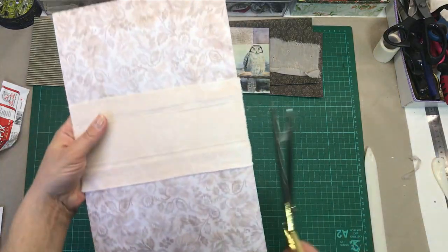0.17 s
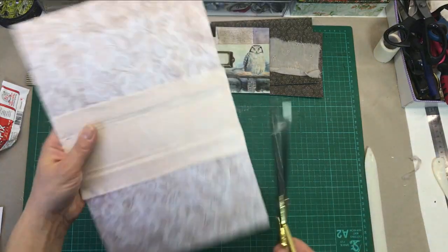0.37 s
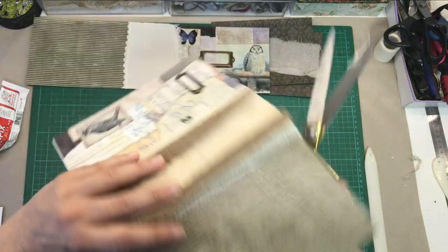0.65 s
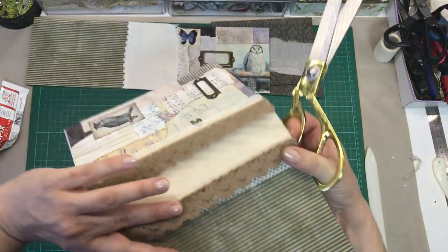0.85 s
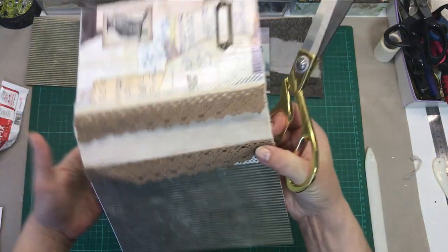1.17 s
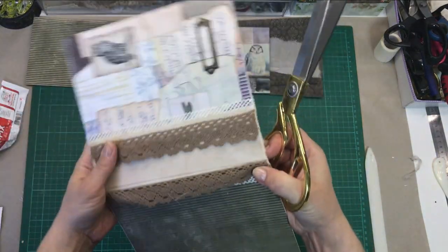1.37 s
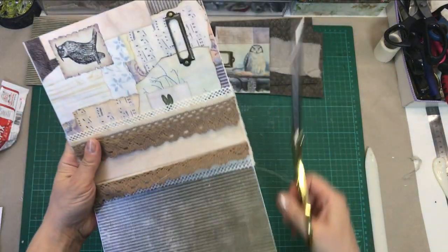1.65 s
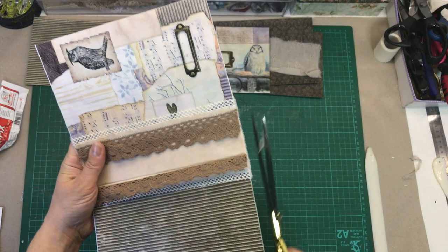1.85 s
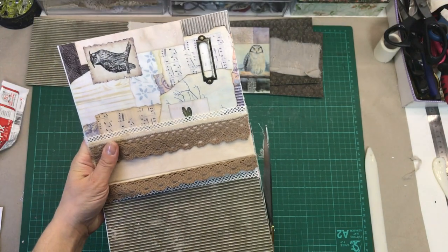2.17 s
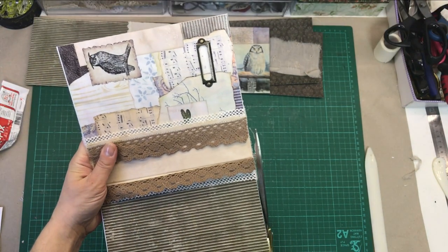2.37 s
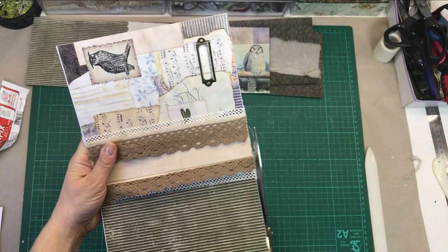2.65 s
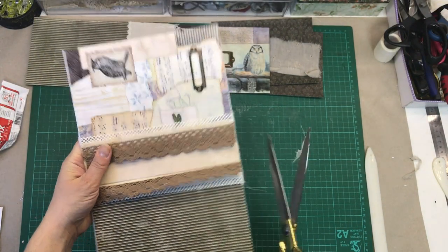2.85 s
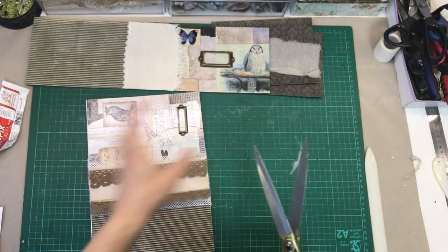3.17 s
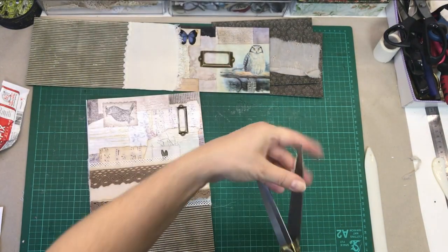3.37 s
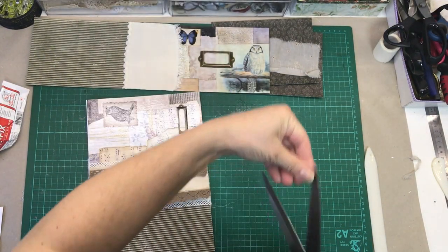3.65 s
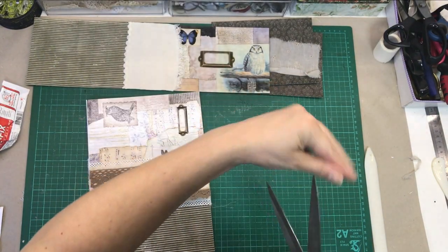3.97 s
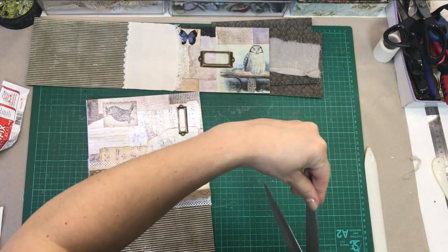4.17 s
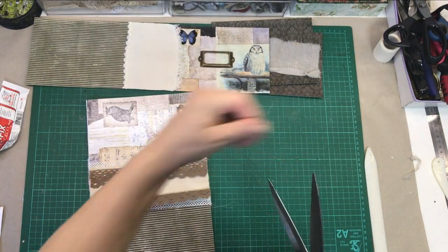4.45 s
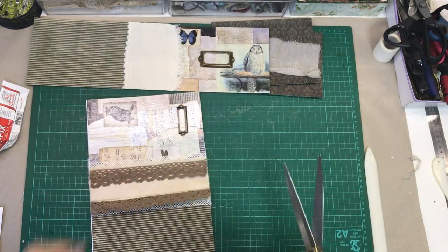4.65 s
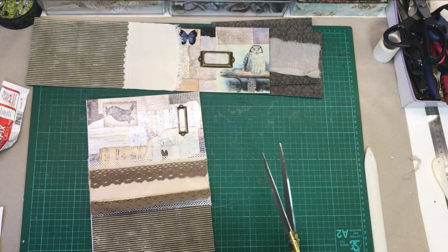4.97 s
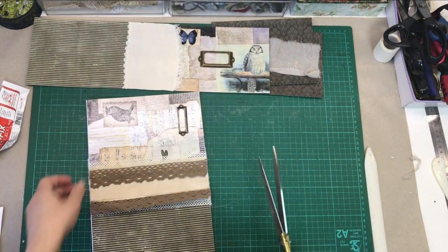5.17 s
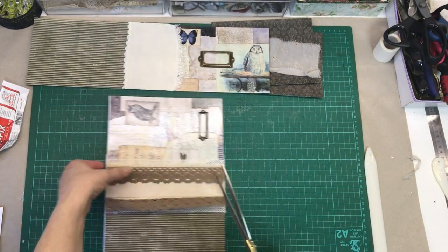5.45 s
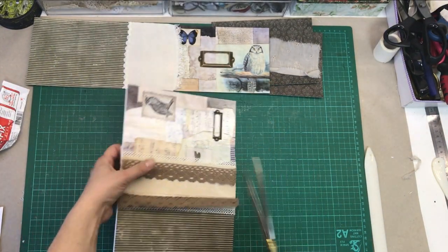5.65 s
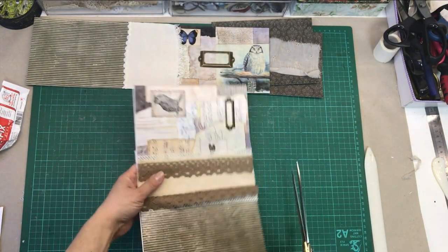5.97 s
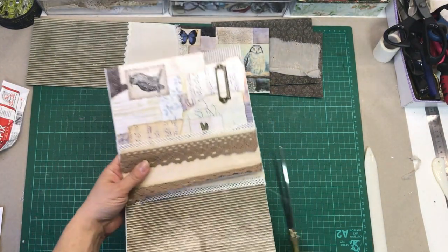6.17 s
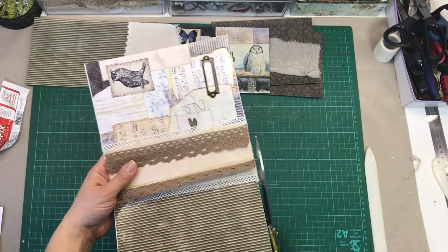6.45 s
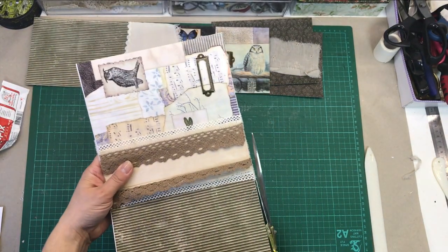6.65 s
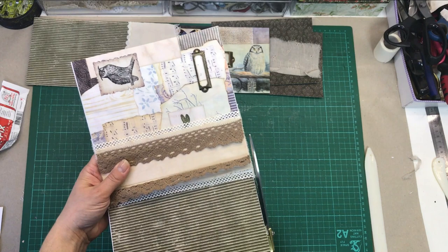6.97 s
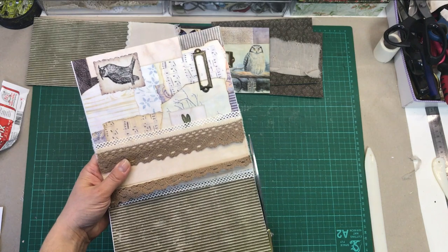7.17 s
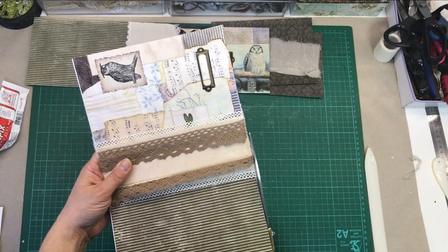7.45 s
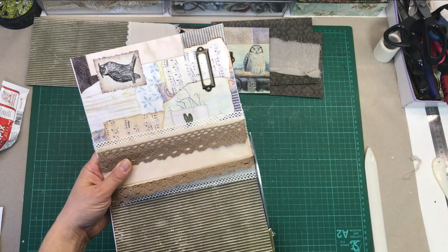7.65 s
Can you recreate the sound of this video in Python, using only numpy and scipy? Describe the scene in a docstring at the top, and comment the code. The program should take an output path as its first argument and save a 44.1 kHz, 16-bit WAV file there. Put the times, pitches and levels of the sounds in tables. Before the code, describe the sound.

Quiet handling of stitched card, faint scissor clicks, one hard clattering drop onto a mat, soft finger brushes, then raspy sliding with a squeaky scuff.

```python
"""A craft table in a quiet room: a stitched card is turned over, patted and dropped while scissors open, shut and snip.
Contacts ring banks of decaying modes: thuds and knocks in the table top, cracks and slaps, clicks in the steel blades.
Dense random slips make the card rasp, rumble and sing on the mat and the fingertips brush over thread.
Shaped noise gives the room tone, a wandering sine the table hum and gliding sines the squeaks of the blades."""
import sys
import numpy as np
from scipy import signal
from scipy.fft import rfft, irfft
from scipy.io import wavfile
from scipy.ndimage import uniform_filter1d

SR = 44100
rng = np.random.default_rng(int(sys.argv[2]) if len(sys.argv) > 2 else 0)


def wrap_up_sound(samples):
    """Save the sound to the file named by the first command line argument, as 16-bit audio."""
    columns = np.atleast_2d(samples).T
    # keep every value between -1 and 1, then stretch to whole-number steps
    tamed = np.clip(columns, -1, 1)
    steps = np.round(tamed * 32767).astype(np.int16)
    wavfile.write(sys.argv[1], SR, steps)


N = 344421


def from_db(db):
    """Amplitude gain of a level in dB."""
    return 10 ** (np.asarray(db) / 20)


def rms_one(x):
    """Scale a sound to unit rms."""
    return x / np.sqrt(np.mean(x ** 2) + 1e-20)


def coloured(x, spectrum, low_hz, high_hz):
    """Filter by a drawn curve, then scale to unit rms between the two frequencies."""
    hz = np.fft.rfftfreq(N, 1 / SR) + 1     # the 1 keeps the logarithm finite
    points = np.array(spectrum)
    gain_db = np.interp(np.log(hz), np.log(points[:, 0]), points[:, 1])
    shaped = rfft(x) * from_db(gain_db)
    inside = (hz > low_hz) & (hz < high_hz)
    return irfft(shaped, N) * N / np.sqrt(2 * np.sum(np.abs(shaped[inside]) ** 2))


def grains(per_s, spread_db):
    """Random slips of uneven size, a few much larger than the rest."""
    size_db = spread_db * np.minimum(rng.exponential(1, N), 5)
    sizes = from_db(size_db) * rng.standard_normal(N)
    return sizes * (rng.random(N) < per_s / SR)


def flicker(rate_hz, depth_db):
    """Random gain that wanders: noise smoothed by two equal poles, in dB rms."""
    r = np.exp(-2 * np.pi * rate_hz / SR)
    wander = signal.lfilter([1], [1, -2 * r, r * r], rng.standard_normal(N))
    return from_db(depth_db * rms_one(wander))


def resonance(x, hz, width_hz):
    """Two-pole band-pass of about unit peak gain."""
    r = np.exp(-np.pi * width_hz / SR)
    poles = [1, -2 * r * np.cos(2 * np.pi * hz / SR), r * r]
    return signal.lfilter(np.array([1, 0, -1]) * (1 - r * r) / 2, poles, x)


def band_pass(x, order, edges_hz):
    """Butterworth band-pass between two edges."""
    return signal.sosfilt(signal.butter(order, edges_hz, "band", fs=SR, output="sos"), x)


def swell(peak_s, rise_s, fall_s):
    """Bell-shaped stroke with its own rise and fall."""
    t = np.arange(N) / SR - peak_s
    return np.exp(-(t / np.where(t < 0, abs(rise_s), abs(fall_s))) ** 2)


def patchy(x, centres_hz):
    """Neighbouring bands that swell and fade apart as different fibres catch."""
    flicker_hz, flicker_db = 42.0, 2.5
    out = np.zeros(N)
    for hz in centres_hz:
        band = resonance(x * rng.choice([-1, 1], N), hz, 0.26 * hz)     # random signs keep bands unrelated
        out += band * flicker(flicker_hz, flicker_db)
    return out


def struck(times, levels_db, modes, chatter_s, chatter, favoured_hz=None, db_per_octave=0):
    """Each blow is a click with a dying chatter behind it and rings every mode with its own strength."""
    blow_spread_db = 1.2
    out, at = np.zeros(N), (np.array(times) * SR).astype(int)
    strengths = from_db(blow_spread_db * rng.standard_normal((len(at), len(modes))))
    if favoured_hz is not None:     # the spot struck favours the modes near one pitch
        octaves_off = np.abs(np.log2(np.array(modes)[:, 0] / favoured_hz[:, None]))
        off_db = db_per_octave * octaves_off
        strongest_db = np.max(off_db + np.array(modes)[:, 1], axis=1, keepdims=True)
        strengths *= from_db(off_db - strongest_db)
    fall = np.exp(-1 / (max(chatter_s, 1e-4) * SR))
    rough = rng.standard_normal(N)
    for k, (hz, level_db, t60_s) in enumerate(modes):
        clicks = np.full(N, 1e-18)
        np.add.at(clicks, at, from_db(np.array(levels_db) + level_db) * strengths[:, k])
        dying = signal.lfilter([1], [1, -fall], clicks)
        clicks += chatter * np.sqrt(1 - fall ** 2) * rough * dying
        clicks = resonance(clicks, hz, 1.25 * hz)     # a yielding contact: the ring builds over a cycle or two
        r, w = from_db(-60 / (t60_s * SR)), 2 * np.pi * hz / SR
        ring = signal.lfilter([0, np.sin(w)], [1, -2 * r * np.cos(w), r * r], clicks)
        out += (-1) ** k * ring     # alternate polarity from mode to mode
    return out


# Spectrum of the quiet room: hz [Hz], density_db [dB per Hz, relative]
ROOM_SPECTRUM = [(15, -50), (25, -6.5), (72, 2), (99, -4.5), (344, -8.5), (962, -17.5), (10400, -28.5),
                 (11900, -24.5), (16000, -28.5)]


def room_tone():
    """Steady noise shaped to the low rumble and faint hiss of a quiet room."""
    level_db = -52.5
    return from_db(level_db) * coloured(rng.standard_normal(N), ROOM_SPECTRUM, 25, 16000)


def room_echo(x):
    """A short tail of dull noise-like echoes."""
    gap_s, t60_s = .004, 0.12
    t = np.arange(int(.3 * SR)) / SR
    dull_noise = signal.lfilter([1], [1, -.6], rng.standard_normal(len(t)))
    tail = dull_noise * from_db(-60 * t / t60_s) * (t > gap_s)
    return signal.fftconvolve(x, tail / np.sqrt(np.sum(tail ** 2)))[:N]


# Hum kept going in the table top by the dragged card: time_s [s], level_db [dB]
HUM_LEVELS = [(.85, -49), (1.3, -41), (1.55, -44), (1.75, -73)]


def table_hum():
    """A low mode of the table top, kept going unevenly by friction: a sine of wandering pitch and level."""
    time_s, level_db = np.transpose(HUM_LEVELS)
    gain = from_db(np.interp(np.arange(N) / SR, time_s, level_db, left=-99, right=-99))
    pitch_hz = 68 * flicker(7.0, 0.39)
    hum = np.sqrt(2) * np.sin(2 * np.pi * np.cumsum(pitch_hz) / SR)
    return gain * flicker(14.0, 1.2) * hum


def fibre_slips():
    """Dense small slips plus a sparser crackle of fibres that catch and let go."""
    crackle_db = -4     # under the dense slips
    crackle = from_db(crackle_db) * rms_one(grains(2500, 1.8))
    dense = rms_one(grains(14000, 1.2))
    return rms_one((dense + crackle) * flicker(36.6, 1.2))


# Resonances of the card's hollows: pitch_hz [Hz], width_hz [Hz], level_db [dB]
CARD_HOLLOWS = [(623, 55, 19), (1040, 440, 10.5), (2555, 440, 4), (3460, 320, 5), (4020, 70, 1.5),
                (6320, 140, 4)]


def rasp_texture(slips):
    """Slips in patchy bands, heard also through the resonances of the card's hollows."""
    rasp = patchy(slips, np.geomspace(300, 12000, num=10))
    through_card = slips * rng.choice([-1, 1], N)     # the same slips with random signs
    for hz, width_hz, db in CARD_HOLLOWS:
        rasp = rasp + from_db(db) * resonance(through_card, hz, width_hz) * flicker(30, 3.0)
    return rasp


# Fingers slide over the card or the blades, rasp and brush alike:
# peak_s [s], half_length_s [s], rasp_level_db [dB], rasp_centre_hz [Hz]
FINGER_RUBS = [(0.12, 0.057, -56, 4830), (.357, 0.04, -53.5, 676), (0.837, 0.085, -50, 3440),
               (0.946, 0.057, -45.5, 1450), (1.4, 0.024, -43.5, 4200), (1.67, 0.36, -56, 1010),
               (2.243, 0.019, -48, 2330), (2.801, 0.035, -50.5, 3540), (3.09, 0.19, -49.5, 1260),
               (3.158, 0.049, -41, 2870)]
# The card drags over the mat, mostly rasp:
# peak_s [s], half_length_s [s], rasp_level_db [dB], rasp_centre_hz [Hz]
MAT_DRAGS = [(1.017, 0.06, -47.5, 1240), (1.146, 0.11, -55.5, 4000), (1.282, 0.021, -53.5, 3600),
             (3.396, 0.15, -54, 2860), (4.6, 0.1, -58.5, 3130), (5.443, 0.047, -41.5, 4700),
             (5.509, 0.074, -40, 2300), (5.658, 0.048, -46, 1980), (5.797, 0.055, -38, 1430),
             (5.868, 0.035, -44, 4270), (5.974, 0.047, -45, 2500), (6.17, 0.046, -56, 945)]


def strokes():
    """Rubs and drags as (peak_s, half_s, rasp_db, centre_hz, brush_db); drags brush less than fingers."""
    hand_brush_db, drag_brush_db = -4, -9.5     # brush relative to rasp
    rubs = [(s, half, db, hz, db + hand_brush_db) for s, half, db, hz in FINGER_RUBS]
    drags = [(s, half, db, hz, db + drag_brush_db) for s, half, db, hz in MAT_DRAGS]
    return rubs + drags


def stroke_shape(peak_s, half_s):
    """A rub or drag swells a little more slowly than it fades."""
    stretch = 1.13     # lengthens the rise and shortens the fall
    return swell(peak_s, half_s * stretch, half_s / stretch)


def rasping(slips):
    """Each rub or drag lets the rasp through in a band of its own."""
    half_width_octaves = 1.42
    rasp, out = rasp_texture(slips), np.zeros(N)
    for s, half, rasp_db, centre_hz, _ in strokes():
        near = slice(max(int((s - .5) * SR), 0), int((s + .5) * SR))
        edges_hz = centre_hz * 2 ** np.array([-half_width_octaves, half_width_octaves])
        band = band_pass(rasp[near], 3, np.minimum(edges_hz, SR / 2.2))
        out[near] += from_db(rasp_db) * stroke_shape(s, half)[near] * rms_one(band)
    return out


def card_rumble(slips):
    """A dragged card also rumbles in the mat: the same slips, low-pitched."""
    top_hz, level_db = 232, -9     # level under the rasp
    low = rms_one(band_pass(slips, 2, [70, top_hz]))
    drag = sum(from_db(db) * swell(s, half, half) for s, half, db, _ in MAT_DRAGS)
    return from_db(level_db) * drag * low


# Tone curve of skin on fibre: hz [Hz], gain_db [dB, relative]
BRUSH_CURVE = [(2060, 0), (3500, -4.5), (6650, -1.5), (10200, -0.5), (12900, -1), (15000, 1.5),
               (16000, -26)]
# Fingertips flick at lace and thread, brush only: peak_s [s], half_length_s [s], level_db [dB]
THREAD_FLICKS = [(0.132, 0.018, -43.5), (1.055, 0.014, -38), (1.341, 0.017, -47), (1.484, 0.016, -46),
                 (1.528, 0.038, -49.5), (1.79, 0.037, -59), (3.677, 0.067, -52), (3.825, 0.029, -49.5),
                 (3.958, 0.049, -57.5), (4.358, 0.066, -52), (4.791, 0.022, -49.5), (5.789, 0.015, -42.5)]


def skin_brush():
    """Very dense slips make a smooth, bright brush; overlapping strokes add in power."""
    texture = patchy(grains(15000, 1.6), np.geomspace(3000, 16000, num=6))
    brush = coloured(texture, BRUSH_CURVE, 6000, 15000)
    power = sum((from_db(db) * swell(s, half, half)) ** 2 for s, half, db in THREAD_FLICKS)
    for s, half, _, _, brush_db in strokes():
        power += (from_db(brush_db) * stroke_shape(s, half)) ** 2
    return np.sqrt(power) * brush


def rubbing():
    """Rasp and rumble share the same fibre slips; the brush of skin lies over them."""
    slips = fibre_slips()
    return rasping(slips) + skin_brush() + card_rumble(slips)


# The pressed card edge sings in one narrow band as it slides:
# peak_s [s], half_length_s [s], level_db [dB], pitch_hz [Hz]
EDGE_SINGS = [(0.985, 0.03, -50, 2150), (1.033, 0.022, -46.5, 2650), (5.561, 0.0088, -50, 1130),
              (5.652, 0.037, -46, 970), (5.714, 0.029, -46.5, 640), (5.759, 0.018, -39.5, 1030),
              (5.78, 0.011, -33, 620), (5.819, 0.0081, -39, 1120), (5.968, 0.015, -45, 2880)]


def singing():
    """Noise slips passed twice through the resonance of the sliding edge."""
    width = .16     # first pass, as a share of the pitch; the second is twice as wide
    slips, out = rng.standard_normal(N), np.zeros(N)
    for s, half, db, hz in EDGE_SINGS:
        once = resonance(slips, hz, width * hz)
        twice = resonance(once, hz, 2 * width * hz)
        out += from_db(db) * swell(s, half, half) * rms_one(twice)
    return out


# Blades meeting at the pivot: start_s [s], level_db [dB, relative], favoured_pitch_hz [Hz]
BLADE_CLICKS = [(0.679, -37, 6000), (2.7698, -40.5, 9500), (2.8127, -39.5, 8300)]
# Ringing modes of the steel: pitch_hz [Hz], level_db [dB], t60_s [s]
BLADE_MODES = [(3166, 4, 0.041), (4480, 3.5, 0.013), (6500, 1, 0.0044), (8500, 9.5, 0.0085),
               (10600, 9, 0.013), (13100, 7, 0.012)]


def blade_clicks():
    """Steel blades ring briefly at each click, with a strong chatter."""
    s, level_db, favoured_hz = np.transpose(BLADE_CLICKS)
    return struck(s, level_db - 8.0, BLADE_MODES, 0.0069, 4.3, favoured_hz, -2.5)


# Blades sliding over each other: start_s [s], end_s [s], from_hz [Hz], to_hz [Hz], level_db [dB]
BLADE_SQUEAKS = [(0.096, 0.158, 7000, 3600, -47.5), (2.754, 2.82, 964, 918, -47.5)]


def blade_squeaks():
    """A sliding contact gives a wavering squeak that glides down, fast at first."""
    out, t = np.zeros(N), np.arange(N) / SR
    for start, end, from_hz, to_hz, db in BLADE_SQUEAKS:
        along = np.clip((t - start) / (end - start), 0, 1)
        hz = to_hz + (from_hz - to_hz) * (1 - along) ** 2
        hz = hz * flicker(89, .22)     # the slip rate stumbles
        tone = np.sin(2 * np.pi * np.cumsum(hz) / SR)
        out += from_db(db) * np.sin(np.pi * along) * flicker(120, 2.3) * tone
    return out


# Card, hands and scissors on the table, and the dull end of each snip:
# start_s [s], knock_level_db [dB, relative], knock_pitch_hz [Hz], thud_level_db [dB], thud_pitch_hz [Hz]
TABLE_CONTACTS = [(.576, -36, 357, -35.5, 120), (0.763, -31, 416, -26, 91), (.825, -20, 700, -21, 140),
                  (0.834, -17, 650, -22.5, 82), (0.93, -13, 520, -31, 200), (1.034, -21.5, 610, -29.5, 169),
                  (1.053, -21.5, 556, -38, 100), (1.118, -16, 493, -20.5, 223),
                  (1.124, -15.5, 600, -24, 200), (1.324, -22.5, 544, -23.5, 175),
                  (1.381, -21, 353, -28, 199), (1.48, -19.5, 392, -30.5, 196), (2.2, -24.5, 506, -26, 195),
                  (2.245, -21, 433, -34, 260), (3.094, -1, 700, -22.5, 94), (3.14, 5, 890, -23, 250),
                  (3.145, -15, 700, -27, 62), (3.167, -9.5, 480, -18.5, 100),
                  (3.175, 2.5, 1600, -18.5, 131), (3.202, -14, 1070, -21.5, 50),
                  (5.308, -24.5, 1360, -28, 109), (5.775, -16.5, 620, -42, 70), (5.904, -23, 750, -36, 90),
                  (5.924, -19, 910, -35, 80.5), (5.938, -10, 990, -49, 70), (5.953, -20.5, 630, -29, 72),
                  (5.996, -16, 845, -38, 50), (6.628, -22.5, 520, -42, 79.6), (7.393, -25, 540, -30.5, 259)]
# The card's hard edge or fitting slaps the mat: start_s [s], level_db [dB], favoured_pitch_hz [Hz]
MAT_SLAPS = [(0.579, -35.5, 2500), (0.825, -27, 1700), (0.837, -30.5, 2420), (1.117, -27, 2080),
             (1.125, -34.5, 3900), (1.322, -27.5, 1650), (1.38, -36.5, 5000), (2.244, -34.5, 2000),
             (3.093, -26.5, 3900), (3.141, -6.5, 2280), (3.145, -11.5, 3550), (3.164, -18, 4470),
             (3.168, -15, 2320), (3.175, -4.5, 2650), (3.203, -20, 2600), (5.311, -34, 2300),
             (5.366, -38, 7060), (5.492, -27, 3070), (5.95, -37, 3450)]
# Modes of the thud, the knock and the crack, each: pitch_hz [Hz], level_db [dB], t60_s [s]
THUD_MODES = [(49, -3, 0.34), (70.3, -2.5, 0.15), (104, -0.5, 0.078), (152.6, -2, 0.077), (190, 2.5, 0.041),
              (256, 3.5, 0.03)]
KNOCK_MODES = [(387, 12.5, 0.039), (488.4, 5, 0.063), (614, 15.5, 0.029), (883, 13, 0.018),
               (1012, 17.5, 0.013), (1570, 15.5, 0.013)]
CRACK_MODES = [(1490, 8, 0.0041), (2210, -0.5, 0.0052), (2670, 2, 0.0037), (3470, -3, 0.0069),
               (4040, -1.5, 0.0078), (6030, 3, 0.0029), (9340, 9, 0.0017)]


def knocks():
    """Every contact thuds in the table, knocks and cracks dully; slaps only crack."""
    crack_db, crack_hz = -24.5, 2400     # a contact's crack: offset from its knock level, favoured pitch
    s, knock_db, knock_hz, thud_db, thud_hz = np.transpose(TABLE_CONTACTS)
    slap_s, slap_db, slap_hz = np.transpose(MAT_SLAPS)
    thud = struck(s, thud_db, THUD_MODES, 0.0012, 0.49, thud_hz, -10.0)
    knock = struck(s, knock_db - 8.0, KNOCK_MODES, 0.0089, .28, knock_hz, -15.5)
    all_s = np.r_[s, slap_s]
    all_db = np.r_[knock_db + crack_db, slap_db]
    all_hz = np.r_[np.full(len(s), crack_hz), slap_hz]
    crack = struck(all_s, all_db, CRACK_MODES, 0.004, 0.89, all_hz, -12)
    return thud + knock + crack


def scene():
    """Table sounds with a little room echo, over the table hum and steady room tone."""
    echo_db = -13.5
    near = rubbing() + singing() + blade_clicks() + blade_squeaks() + knocks()
    return (room_tone() + table_hum() + near + from_db(echo_db) * room_echo(near))[None]


# Dips from the microphone housing: pitch_hz [Hz], width_hz [Hz], gain_db [dB]
HOUSING_DIPS = [(7680, 420, -3.5), (10500, 430, -7)]


def record(dry):
    """Bass roll-off, housing dips, a gain control that ducks after loud blows, then the top is cut."""
    threshold_db, recovery_db_per_s, duck_share, smoothing = -26, 40, .3, .002
    x = signal.sosfilt(signal.butter(3, 36, "high", fs=SR, output="sos"), dry[0])
    for hz, width_hz, db in HOUSING_DIPS:
        x = x - (1 - from_db(db)) * resonance(x, hz, width_hz)
    power_db = 10 * np.log10(uniform_filter1d(x ** 2, size=200) + 1e-12)
    over_db = np.maximum(power_db - threshold_db, 0)
    slope = recovery_db_per_s * np.arange(N) / SR
    held_db = np.maximum.accumulate(over_db + slope) - slope     # jumps up, then falls steadily
    smooth_db = signal.lfilter([smoothing], [1, -(1 - smoothing)], held_db)
    x = x * from_db(-duck_share * smooth_db)
    return signal.sosfilt(signal.ellip(12, .5, 70, 15650, fs=SR, output="sos"), x)[None]


dry = scene()
out = record(dry)
wrap_up_sound(out)
```